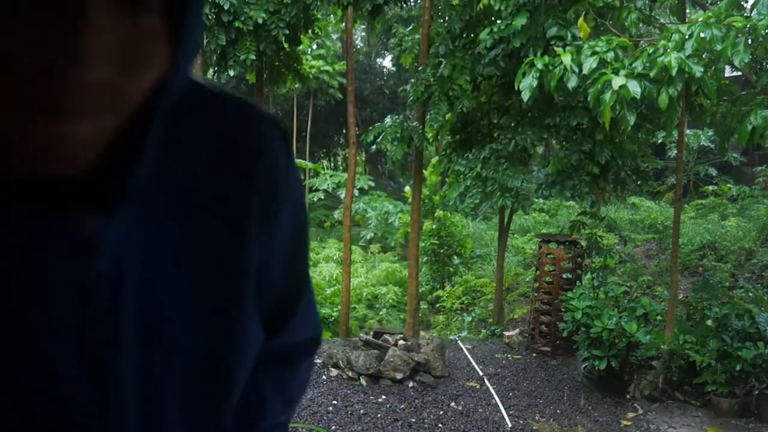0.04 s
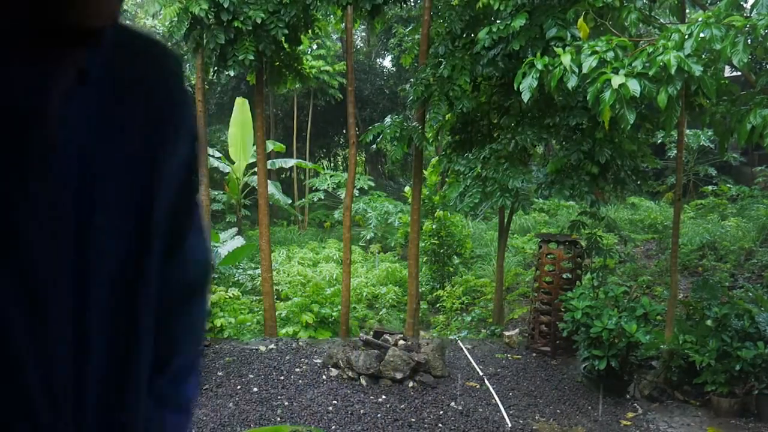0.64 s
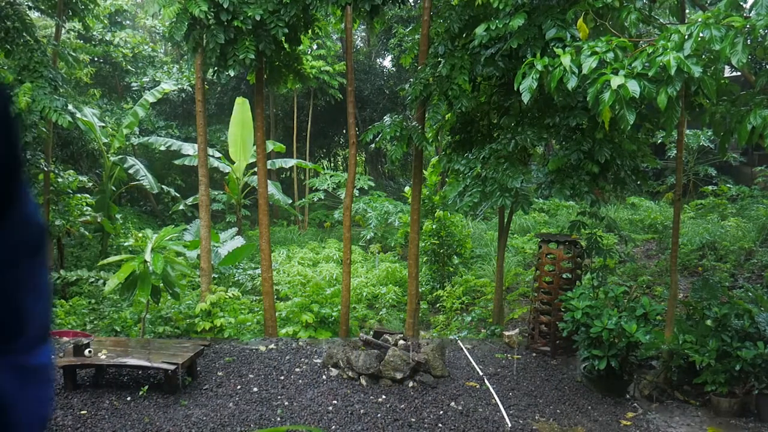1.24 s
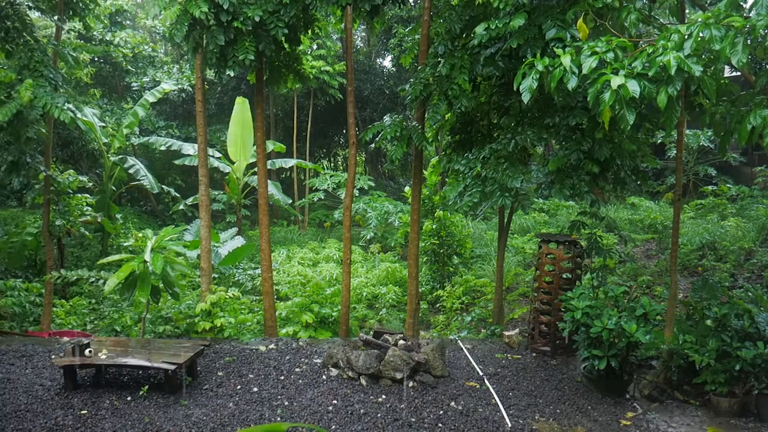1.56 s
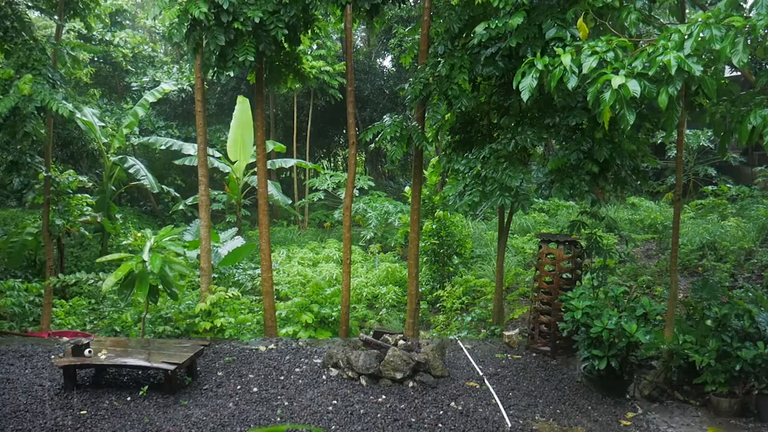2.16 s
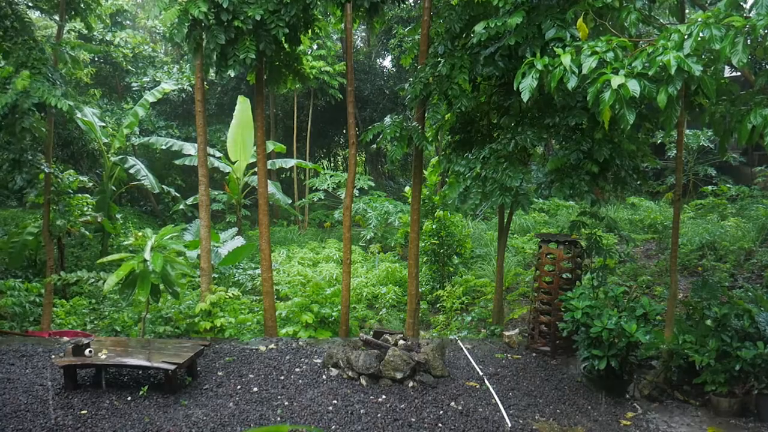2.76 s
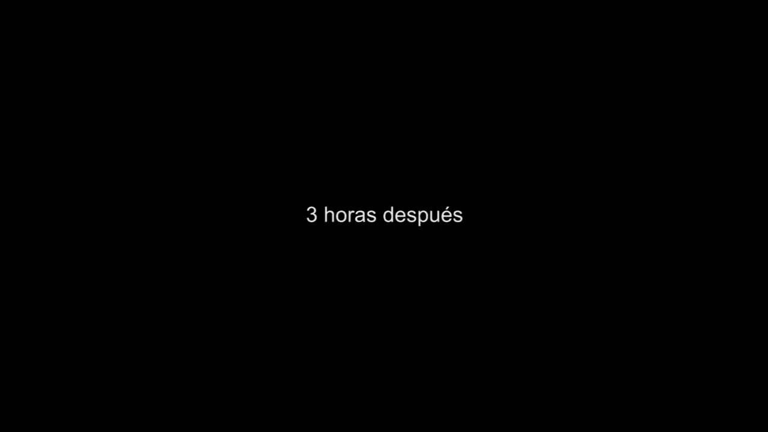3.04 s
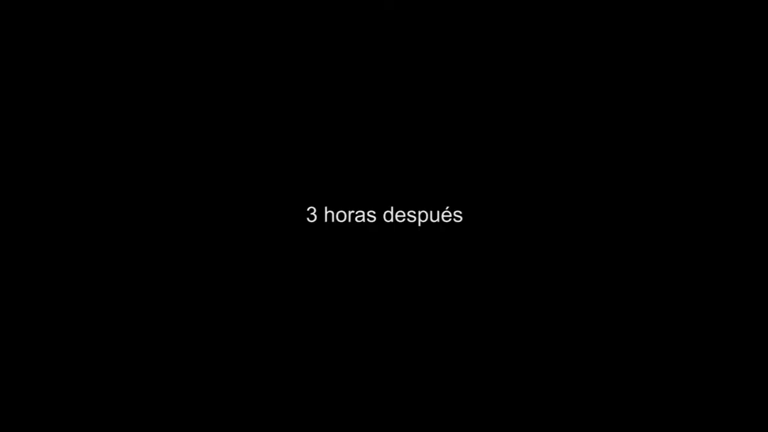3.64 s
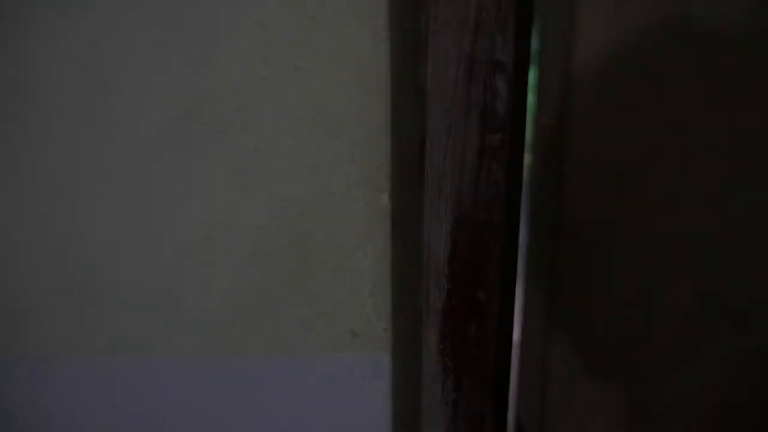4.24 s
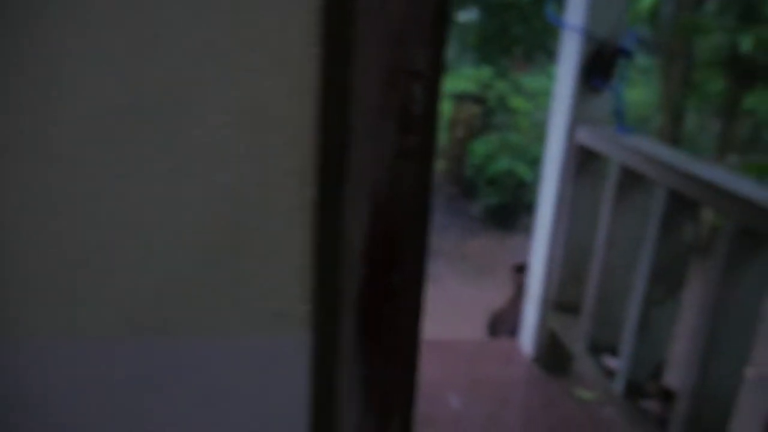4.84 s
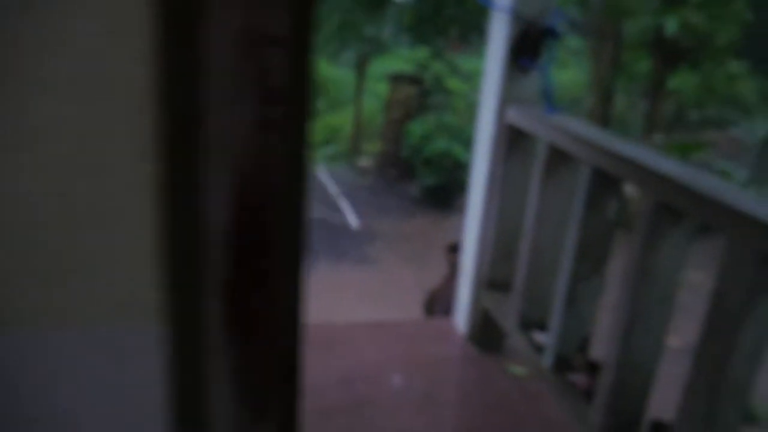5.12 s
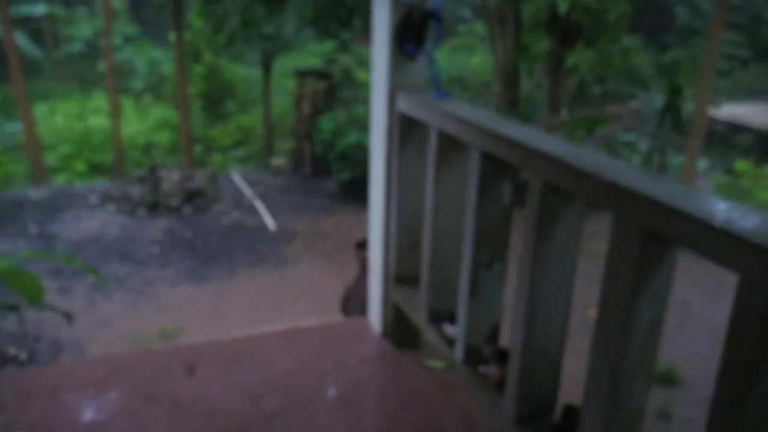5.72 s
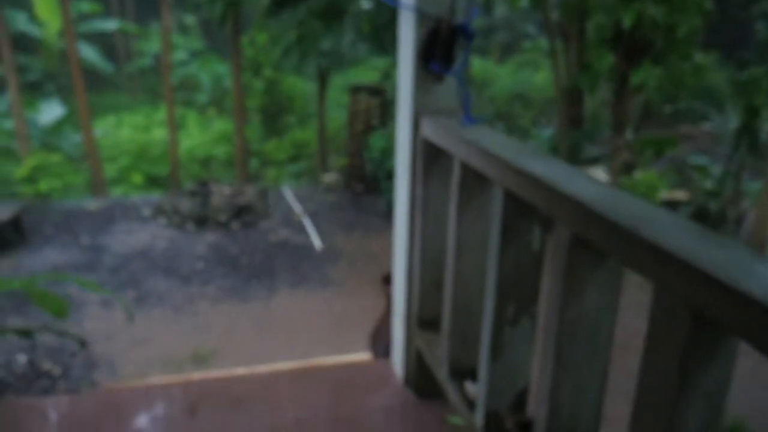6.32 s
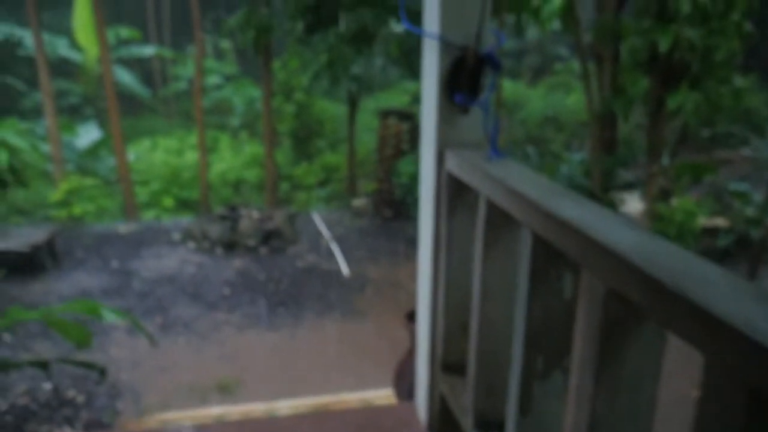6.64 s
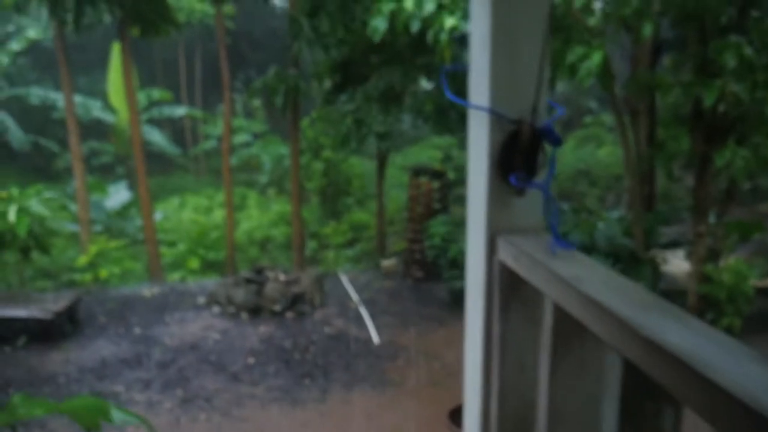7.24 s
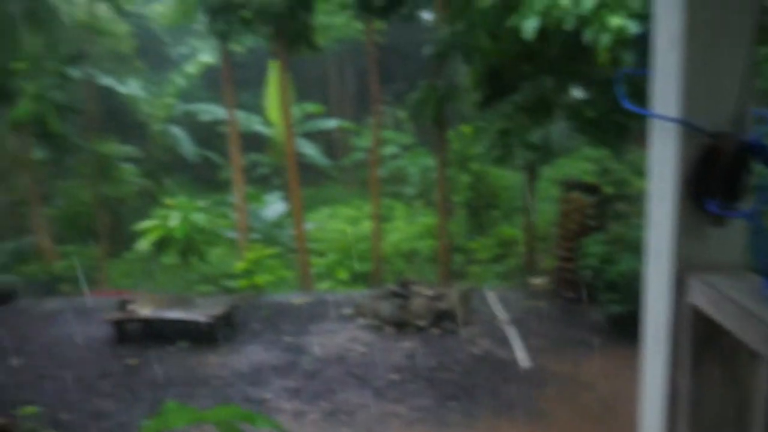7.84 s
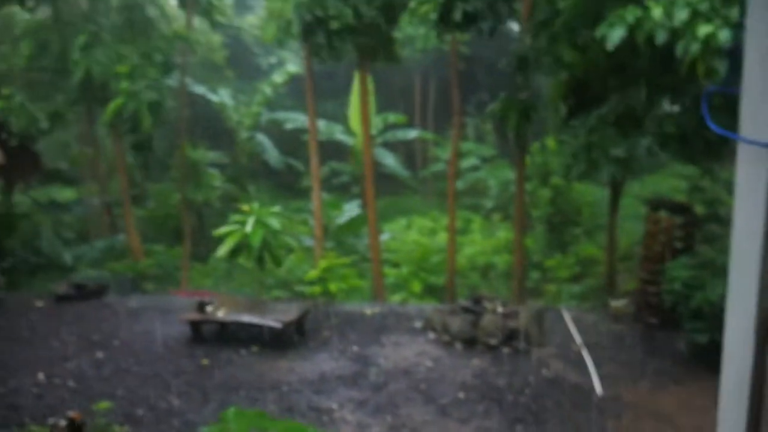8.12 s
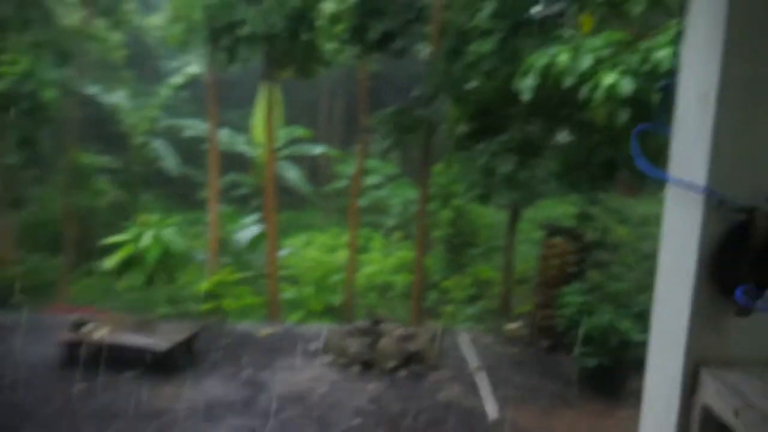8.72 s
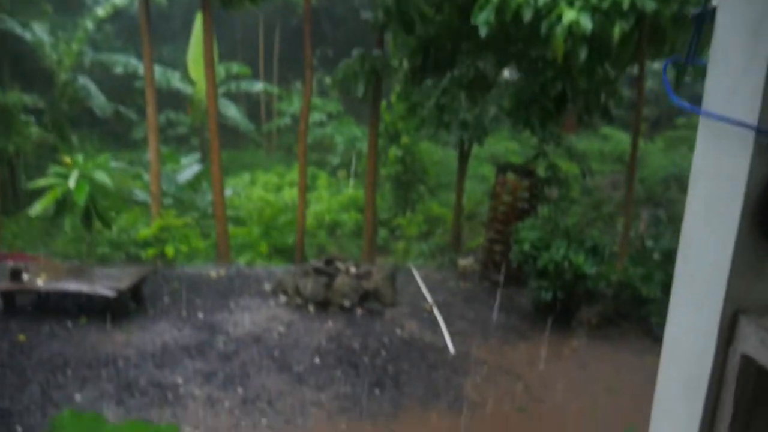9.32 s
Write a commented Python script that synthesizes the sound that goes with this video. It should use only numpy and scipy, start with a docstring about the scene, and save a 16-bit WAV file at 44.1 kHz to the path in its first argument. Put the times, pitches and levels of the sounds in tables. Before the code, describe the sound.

Rain and fat drips hit leaves and gravel, cut out, then return fuller as a wooden door rattles and opens onto a porch.

```python
"""Heavy rain in a garden, then on a porch

Countless drops on leaves and gravel merge into a wash, while big drips slap down close by.
After a moment of silence the rain is heard from behind a wooden door, which knocks in its frame,
unlatches and squeaks open on a dry hinge. On the porch the downpour is fuller and denser,
and the hand-held microphone rumbles faintly."""
import sys
import numpy as np
from scipy import signal
from scipy.fft import rfft, irfft, next_fast_len
from scipy.io import wavfile

SR = 44100
rng = np.random.default_rng(int(sys.argv[2]) if len(sys.argv) > 2 else 0)


def digitize_waveform(pressure):
    """Quantize a signal to 16-bit integers and store it at the path in sys.argv[1].

    Rows of a 2-D input are taken as channels; values are limited to [-1, 1].
    """
    field = np.atleast_2d(pressure).T
    bounded = np.clip(field, -1, 1)
    quanta = np.round(bounded * 32767).astype(np.int16)
    wavfile.write(sys.argv[1], SR, quanta)


N = 422037

GARDEN_END_S, PORCH_START_S, DOOR_OPENS_S = 3.0027, 3.8826, 4.22


def from_db(db):
    """Turn decibels into a number to multiply by."""
    return 10 ** (np.asarray(db) / 20)


def unit_power(x):
    """Scale a sound so that its average power is 1."""
    return x / np.sqrt(np.mean(x ** 2) + 1e-20)


def seconds():
    """The time of each sample."""
    return np.arange(N) / SR


def curve(points):
    """Join (time, value) points with straight lines."""
    return np.interp(seconds(), *np.transpose(points))


def coloured(x, colour):
    """Make each frequency louder or softer, following (f/Hz, gain/dB) points."""
    size = next_fast_len(N + 8192)
    hz, db = np.transpose(colour)
    grid_hz = np.maximum(np.fft.rfftfreq(size, 1 / SR), 1)
    gain = from_db(np.interp(np.log(grid_hz), np.log(hz), db))
    return irfft(rfft(x, size) * gain, size)[..., :N]


def filtered(x, hz, kind, order=2):
    """Keep the "low" part of a sound, the "high" part or a "band" between two frequencies."""
    edges = np.minimum(hz, .47 * SR)
    return signal.sosfilt(signal.butter(order, edges, kind, fs=SR, output="sos"), x + 1e-18)


def drift(per_s):
    """A random wander of about 1 either way, changing course per_s times a second."""
    points = rng.standard_normal(8000)
    return np.interp(seconds() * per_s, np.arange(len(points)), points)


def clicks(times, sizes):
    """A one-sample click at each time."""
    return np.bincount(np.round(np.asarray(times) * SR).astype(int), sizes, N)[:N]


def ring(hits, hz, t60):
    """Each hit starts a pure tone that fades by 60 dB in t60 seconds."""
    decay = np.exp(-np.log(1000) / (t60 * SR))
    step = 2 * np.pi * hz / SR
    return signal.lfilter([0, np.sin(step)], [1, -2 * decay * np.cos(step), decay ** 2], hits + 1e-18)


def fading_noise(hits, t60):
    """Noise that leaps up with each hit and dies away."""
    decay = np.exp(-np.log(1000) / (t60 * SR))
    return signal.lfilter([1], [1, -decay], hits + 1e-18) * rng.standard_normal(N)


def patter(per_s, spread_db, low_hz, high_hz, bands=8):
    """Drops land at random as tiny ticks, pitched by what they hit and louder when near."""
    out = 0
    for hz in np.geomspace(low_hz, high_hz, bands):
        when, distance, sign = rng.random((3, 12000))[:, :int(per_s * N / SR / bands)]
        nearness = -np.log(np.maximum(distance, np.exp(-5)))
        drops = clicks(when * (N - 1) / SR, from_db(spread_db * nearness) * np.sign(sign - .5))
        out = out + filtered(unit_power(drops), [hz / 2, hz * 2], "band", order=1)
    return out / np.sqrt(bands)


def spatter(per_s, spread_db, low_hz):
    """Drops shatter on the gravel, each into a puff of mist that hisses and dies at once."""
    when, distance = rng.random((2, 8000))[:, :int(per_s * N / SR)]
    nearness = -np.log(np.maximum(distance, np.exp(-4)))
    hits = clicks(when * (N - 1) / SR, from_db(spread_db * nearness))
    return unit_power(filtered(fading_noise(hits, t60=.014), low_hz, "high"))


def rain(wash_db, splash_db, colour, drops, flutter_db):
    """Far drops blur behind near ones; leaves give the low wash, gravel and puddles the high splash."""
    # the small left-right difference at two close microphone openings: f/Hz, level/dB
    stereo_width = [(60, -19), (300, -21), (1200, -22.5), (4000, -18.5), (12000, -16.3)]
    middle = unit_power(rng.standard_normal(N) + drops)
    side = coloured(rng.standard_normal(N), stereo_width)
    shower = coloured(np.array([middle + side, middle - side]), colour)
    body = coloured(shower, [(1500, 0), (2500, -5), (4000, -20), (8000, -60)])
    wash = body / np.std(filtered(shower[0], [250, 2000], "band", order=6))
    splash = (shower - body) / np.std(filtered(shower[0], [3000, 14000], "band", order=6))
    wash *= from_db(wash_db + flutter_db * drift(25))
    splash *= from_db(splash_db + flutter_db * drift(30))
    return wash + splash


def garden_rain():
    """Rain spatters on gravel and ticks on the nearest leaves; wash and splash swell together."""
    # how hard it rains: t/s, relative level/dB
    strength = [(0, -35), (0.28, -33.5), (0.56, -31), (1.1, -31), (1.56, -28), (1.82, -31), (2.2, -30.5),
                (2.6, -29), (3.0, -29.5)]
    # the tone of rain in the open: f/Hz, gain/dB
    colour = [(20, -14), (50, -15.5), (80, -4.5), (110, -7.5), (180, -6), (420, -0.2), (1400, -1),
              (3000, -3), (5200, -3.5), (8400, -5.5), (10000, -11), (13000, -12.5), (15500, -20.5)]
    drops = from_db(-8.5) * patter(per_s=1900, spread_db=3, low_hz=2500, high_hz=14000)
    mist = from_db(-11) * spatter(per_s=110, spread_db=4, low_hz=5500)
    ticks = patter(per_s=280, spread_db=8.5, low_hz=11100, high_hz=17000, bands=2)
    ticks = from_db(-20.5) * filtered(ticks, 10000, "high", order=4)
    wash_db = curve(strength)
    swell_db = wash_db - wash_db[seconds() < GARDEN_END_S].mean()
    splash_db = -32 + swell_db
    return from_db(-0.54) * rain(wash_db, splash_db, colour, drops + mist + ticks, flutter_db=1.13)


def drips(rows):
    """Each drip lands with a splat and a snap; the leaf or puddle rings and spray falls back."""
    splat_cycles, rise_per_cycle, ring_cycles = .74, .18, 3.2
    snap_hz, snap_width_s, snap_delay_s = 10000, .00006, .0002
    out, lead = np.zeros(N + 4096), 64  # a splat begins a few samples before its middle
    t = (np.arange(2048) - lead) / SR
    after = np.maximum(t, 0)
    fizz = from_db(-17) * np.exp(-after / .0018)
    falling_droplets = from_db(-28) * np.exp(-after / .008)
    spray_shape = (t > 0) * (fizz + falling_droplets)
    for s, db, hz, snap_db in rows:
        cycles = hz * t
        # the film of water thins as it spreads, so its pitch shoots upward
        phase = 2 * np.pi * (cycles + rise_per_cycle * cycles ** 2 / 2)
        splat = np.exp(-(cycles / splat_cycles) ** 2) * np.sin(phase)
        late = t - snap_delay_s
        snap = np.exp(-(late / snap_width_s) ** 2) * np.cos(2 * np.pi * snap_hz * late)
        leaf = np.exp(-hz * after / ring_cycles) * np.sin(2 * np.pi * hz * after)
        spray = filtered(spray_shape * rng.standard_normal(len(t)), [hz / 1.4, hz * 1.9], "band")
        drip = splat + from_db(snap_db) * snap + from_db(-15) * leaf + spray
        at = round(s * SR)
        out[at:at + len(t)] += from_db(db) * drip / np.max(np.abs(drip))
    return out[lead:lead + N]


def big_drips():
    """Fat drips slap down close by."""
    # one row a drip: t/s, peak level/dB, splat f/Hz, snap against splat/dB
    landings = [(0.0771, -21, 12500, -4), (0.1849, -16, 6700, -20), (0.1927, -15.5, 4700, -9),
                (0.2418, -16, 6500, 2), (0.2536, -20, 7100, -9), (0.3963, -18, 13000, -14),
                (0.4101, -17, 13000, -14), (0.6257, -10, 2750, 1), (0.7992, -19, 13000, -14),
                (0.8024, -17, 7700, -12), (0.8117, -5, 6900, -24), (0.8871, -20, 13000, -14),
                (0.9465, -15, 3600, 1), (1.0724, -11.5, 4500, -20), (1.2606, -15, 2600, -16),
                (1.377, -10.5, 4500, -24), (1.4724, -19, 7700, -16), (1.6107, -5.5, 3800, -3),
                (1.6151, -6.5, 3184, -12), (1.6646, -14, 6860, -20), (1.7424, -19, 7700, -14),
                (1.7835, -6, 8600, -5.5), (1.8257, -17, 7100, -14), (1.8746, -10, 2900, -8),
                (1.9029, -9, 4520, -16), (1.9369, -11, 7200, -16), (1.9549, -6, 2500, -2),
                (2.1153, -9.5, 6300, -14), (2.1794, -6, 3830, -10.5), (2.3128, -17, 6200, -12),
                (2.3842, -12, 8900, -12), (2.417, -12, 5300, -5), (2.6721, -8, 4400, -14),
                (2.6782, -6, 2400, -1), (2.878, -16, 7740, -13.5), (4.9894, -14, 10450, -12.5),
                (5.3835, -11, 9100, -14), (5.8837, -10, 7900, -16), (6.2803, -9, 7400, -16),
                (7.1352, -8, 6500, -7), (7.2068, -12, 5500, -14), (7.213, -11, 4800, -18),
                (7.2688, -12, 8800, -9), (7.4612, -14, 11700, -14), (7.6433, -10, 9000, -14),
                (7.669, -13, 4800, -14), (7.6988, -15, 4100, -9), (7.928, -11, 7900, -14),
                (8.1146, -11, 9800, -14), (8.2015, -15, 10000, -14), (8.4484, -9, 3300, -9),
                (8.5084, -11, 6400, -9), (8.5141, -10, 2800, -12), (8.6176, -12, 4100, -14),
                (8.6228, -13, 4100, -9), (8.8174, -16, 7700, -14), (8.9199, -15, 12500, -14),
                (9.0351, -9, 7900, -6), (9.1248, -10, 8400, -9), (9.1996, -14, 9100, -14),
                (9.2602, -8, 12500, -12), (9.4125, -9, 4000, -12), (9.4579, -11, 11700, -14),
                (9.5025, -9, 9000, -6), (9.5258, -12, 2900, -12)]
    return drips(landings)


def small_drips(start_s, end_s, per_s, mean_db, spread_db=4.5, low_hz=3000, high_hz=10300):
    """Lighter drips fall at random, each with its own size and pitch."""
    when, size, pitch, hardness = rng.random((600, 4))[:int(per_s * (end_s - start_s))].T
    times = start_s + when * (end_s - start_s)
    db = mean_db + spread_db * (2 * size - 1)
    hz = low_hz * (high_hz / low_hz) ** pitch
    snap_db = -6 - 12 * hardness
    return drips(zip(times, db, hz, snap_db))


def spills(hz=4510):
    """Water tips off a leaf and lands on the gravel with a short, soft hiss."""
    # one row a spill: t/s, level/dB
    splashes = [(0.528, -22), (1.328, -21), (8.385, -15.5)]
    s, db = np.transpose(splashes)
    hiss = fading_noise(clicks(s, from_db(db)), t60=.12)
    return filtered(hiss, [hz / 1.3, hz * 1.75], "band")


def bumps():
    """Soft, low thuds that die away quickly."""
    # one row a thud: t/s, level/dB, f/Hz, fade time/s
    thuds = [(1.33, -33, 68, .14), (1.96, -34, 65, .14), (2.655, -32, 64.8, 0.17),
             (3.925, -22.5, 54.8, 0.21), (4.08, -30, 75, 0.53), (4.805, -28, 70, .14), (6.01, -30, 34, .16),
             (7.905, -27, 58, 0.19), (8.34, -30, 36, .14), (8.70, -28, 42, 0.13), (8.76, -32, 38, 0.14)]
    tones = sum(ring(clicks([s], [from_db(db)]), hz, t60) for s, db, hz, t60 in thuds)
    return filtered(tones, 160, "low")


def doorway(shut_db, opens_in_s):
    """Gain in dB past the opening door: the wider the gap, the more power gets in."""
    power = np.interp(seconds(), [DOOR_OPENS_S, DOOR_OPENS_S + opens_in_s], [from_db(shut_db) ** 2, 1])
    return 10 * np.log10(power)


def porch_rain():
    """The downpour swells and brightens as the door opens; puddles plop under the roof's edge."""
    # how loud the rain is with the door open: t/s, relative level/dB
    strength = [(5.15, -27), (6.3, -28.5), (6.8, -27), (7.85, -28.5), (8.35, -28), (8.72, -30.5),
                (9.0, -29), (9.55, -29)]
    # the tone of rain on the porch: f/Hz, gain/dB
    colour = [(30, -6), (100, -8), (200, -3.5), (420, 0.85), (1400, -0.5), (3200, -5), (5200, -6.5),
              (6500, -9.5), (8400, -9), (10000, -14.5), (13000, -16), (15500, -24.5)]
    t, swing_s = seconds(), .82
    drops = from_db(-3.5) * patter(per_s=5000, spread_db=3.5, low_hz=1450, high_hz=12100)
    plops = from_db(-5.5) * patter(per_s=450, spread_db=1.6, low_hz=500, high_hz=1790, bands=4)
    # towards the edge of the porch single drops land close by
    nearness = np.interp(t, [4.5, 7.5, 9.2], [.5, .65, 1.05])
    ticks = patter(per_s=1000, spread_db=11.5, low_hz=5000, high_hz=19000, bands=4)
    mist = spatter(per_s=170, spread_db=2, low_hz=4500)
    near_drops = nearness * (from_db(-13.5) * ticks + from_db(-7.5) * mist)
    # the wash bends round the door as soon as there is a gap; the splash needs the whole doorway
    wash_db = curve(strength) + doorway(shut_db=-7, opens_in_s=.26)
    splash_db = curve(strength) + doorway(shut_db=-9, opens_in_s=swing_s)
    splash_db += .22 - .1045 * (t - DOOR_OPENS_S)  # the splash slowly softens a little
    shower = rain(wash_db, splash_db, colour, drops + plops + near_drops, flutter_db=.5)
    # the door holds back the finest hiss a little more
    fine_hiss = coloured(shower, [(4000, -40), (7000, -8), (10000, 0)])
    shower += (from_db(doorway(shut_db=-1.5, opens_in_s=.55)) - 1) * fine_hiss
    # the hall behind the doorway adds body until it is left behind
    hall = coloured(shower, [(60, -25), (160, -8), (420, -15), (1000, -40), (3000, -60)])
    shower += np.interp(t, [5.2, 6.3], [1, 0]) * hall
    # through the crack of the shut door the rain comes mostly from one direction
    width = np.interp(t, [DOOR_OPENS_S, DOOR_OPENS_S + swing_s], [.6, 1])
    centre = shower.mean(axis=0)
    return from_db(1.31) * (centre + width * (shower - centre))


def handling():
    """The carried microphone rumbles and heaves as the hand sways; air brushes its two openings."""
    # the tone of the rumble: f/Hz, gain/dB
    colour = [(4, -6), (9, 3), (14, 8.5), (22, -4), (32, -13), (45, -26), (80, -31), (200, -53),
              (500, -100)]
    # each sway is one slow heave of pressure: t/s, peak level/dB
    sways = [(6.05, -21), (8.35, -24), (8.72, -17.5), (9.41, -26)]
    t, sway_hz, sway_width_s = seconds(), 8.8, .069
    rumble_db = np.interp(t, [4.9, 5.4], [-34, -33]) + 1.5 * drift(2.94)  # louder once the walk begins
    rumble = from_db(rumble_db) * unit_power(coloured(rng.standard_normal(N), colour))
    heaves = 0
    for s, db in sways:
        swell = from_db(db) * np.exp(-((t - s) / sway_width_s) ** 2)
        heaves += swell * np.cos(2 * np.pi * sway_hz * (t - s))
    draught = unit_power(filtered(rng.standard_normal((2, N)), 45, "low"))
    return rumble - heaves + from_db(-68) * draught


def door_knocks():
    """The wooden door rattles in its frame; each knock crunches and sets the panel ringing."""
    # one row a knock: t/s, level/dB, extra low thud/dB
    knocks = [(3.886, -20, 0), (3.892, -28, 3), (3.898, -16, -4), (3.907, -12.5, 1), (3.913, -18, -6),
              (3.961, -19, -9.5), (3.966, -25, -10), (3.971, -20, -12), (4.009, -23, 10.5),
              (4.053, -15.5, 8), (4.058, -16.5, 8.5)]
    # the panel's natural tones: f/Hz, level/dB, fade time/s
    panel_tones = [(38, -21, 0.33), (61, -18, 0.3), (109, -10.5, 0.14), (203, -11.5, 0.081),
                   (330, -10.5, 0.045), (410, -16, 0.1), (500, -5.5, 0.056), (680, -11, 0.037),
                   (800, -6, 0.025), (1074, -4.5, 0.045), (1180, -11, 0.043), (1400, -18, .025),
                   (1590, -9, 0.033), (1960, -30, .025), (2840, -6, 0.011)]
    s, db, thud_db = np.transpose(knocks)
    wood = 0
    for hz, tone_db, t60 in panel_tones:
        hit_db = db + tone_db + (thud_db if hz < 150 else 0) + rng.normal(0, 2.7, len(s))
        wood += ring(clicks(s, from_db(hit_db)), hz, t60) * rng.choice([-1, 1])
    crunch = filtered(fading_noise(clicks(s, from_db(db)), t60=.069), [170, 1900], "band", order=3)
    return from_db(-.5) * wood + from_db(-1) * crunch


def hinge():
    """The dry hinge sticks and slips: short wavering whistles, raspy where the slipping is uneven."""
    # one row a squeak: middle t/s, length/s, f/Hz, level/dB, share of rasp (0-1), octave above/dB
    squeaks = [(3.982, 0.022, 2710, -17.5, 0.26, -24), (4.505, 0.027, 2990, -18.5, 0.76, -16),
               (4.53, 0.014, 3200, -22, 0.3, -12), (4.541, 0.016, 3060, -14.5, 0, -11),
               (4.569, 0.037, 3100, -28, 0.3, -20), (4.63, .03, 3100, -26, 0.4, -20)]
    out, t = np.zeros(N), seconds()
    for s, length, hz, db, rasp, octave_db in squeaks:
        near = abs(t - s) < .06
        progress = (t[near] - s) / length  # 0 at the middle of the squeak
        pitch_hz = hz * (1 - .0112 * np.tanh(progress) + .023 * drift(500)[near])
        phase = 2 * np.pi * np.cumsum(pitch_hz) / SR
        whistle = np.sin(phase) + from_db(octave_db) * np.sin(2 * phase)
        scrape = unit_power(filtered(rng.standard_normal(len(phase)), [hz / 2, hz * 1.5], "band"))
        swell = from_db(db) * np.exp(-(2 * progress) ** 2)
        out[near] += swell * ((1 - rasp) * whistle + rasp * scrape)
    return out


def latch():
    """The metal latch springs back with a crack and rings briefly."""
    # the latch's strikes: t/s, level/dB
    strikes = [(4.195, -15.5), (4.197, -29.5)]
    # the metal's natural tones: f/Hz, level/dB, fade time/s
    metal_tones = [(1610, -9.5, .06), (2100, -1, .005), (2900, -7, .004), (4000, -4, .004),
                   (5600, -3, 0.0076), (8000, -10, .008), (11900, -12, 0.013)]
    s, db = np.transpose(strikes)
    hits = clicks(s, from_db(db))
    metal = 0
    for hz, tone_db, t60 in metal_tones:
        metal += from_db(tone_db) * ring(hits, hz, t60) * rng.choice([-1, 1])
    crack = filtered(fading_noise(hits, t60=.032), [1500, 9000], "band")
    return from_db(2.5) * metal + crack


def scene():
    """The garden, a silence, then the door and the porch."""
    t = seconds()
    in_garden = t < GARDEN_END_S
    on_porch = np.clip((t - PORCH_START_S) / .004, 0, 1)
    house = porch_rain() + door_knocks() + latch() + hinge() + handling()
    garden = garden_rain()
    leaf_drips = small_drips(0, GARDEN_END_S, per_s=24, mean_db=-24)
    roof_drips = small_drips(4.6, N / SR, per_s=55, mean_db=-19)  # heard as the door swings open
    close_by = spills() + bumps() + big_drips() + leaf_drips + roof_drips
    return garden * in_garden + house * on_porch + close_by * (in_garden + on_porch)


def record(dry, cutoff_hz=15800):
    """Cut off the very highest treble steeply."""
    return signal.sosfilt(signal.ellip(10, .1, 80, cutoff_hz, fs=SR, output="sos"), dry + 1e-18)


dry = scene()
out = record(dry)
digitize_waveform(out)
```